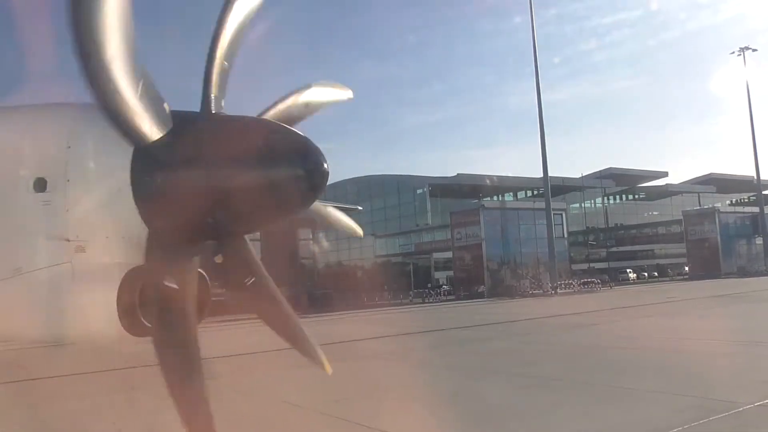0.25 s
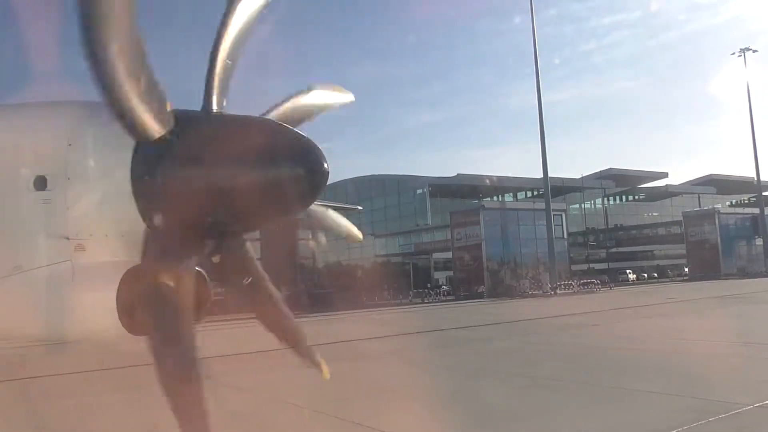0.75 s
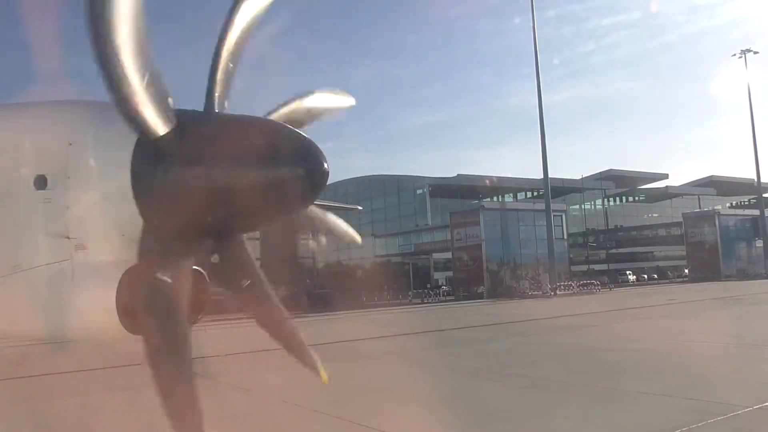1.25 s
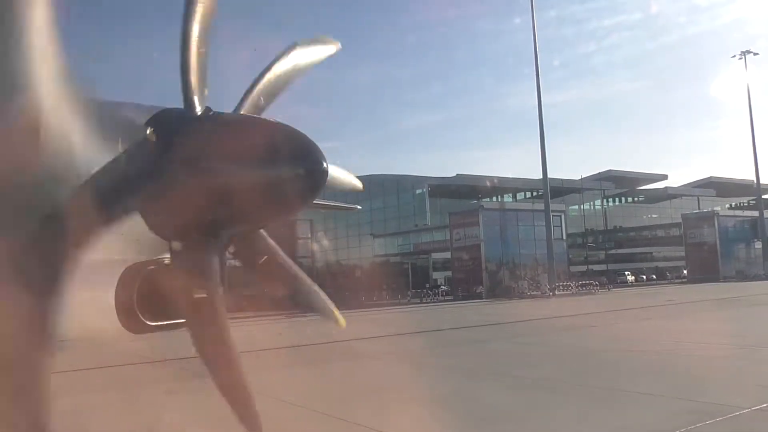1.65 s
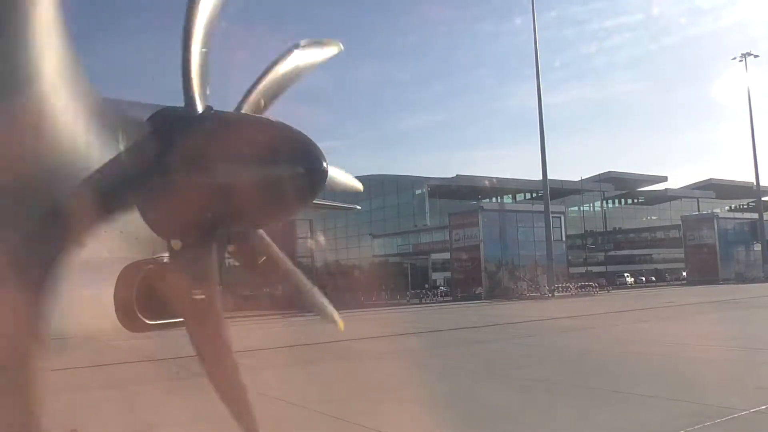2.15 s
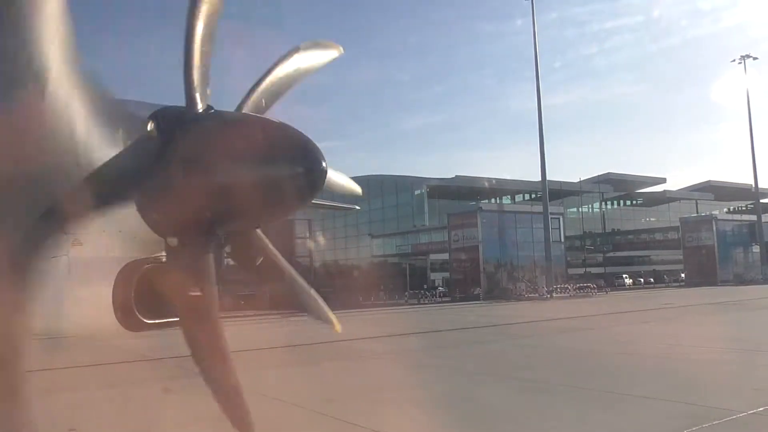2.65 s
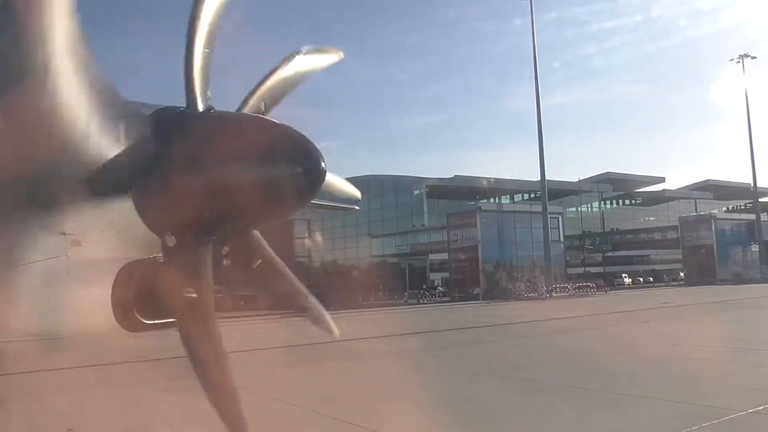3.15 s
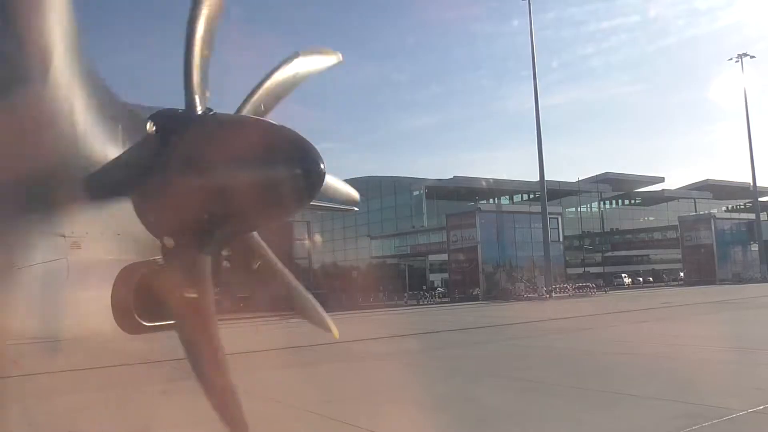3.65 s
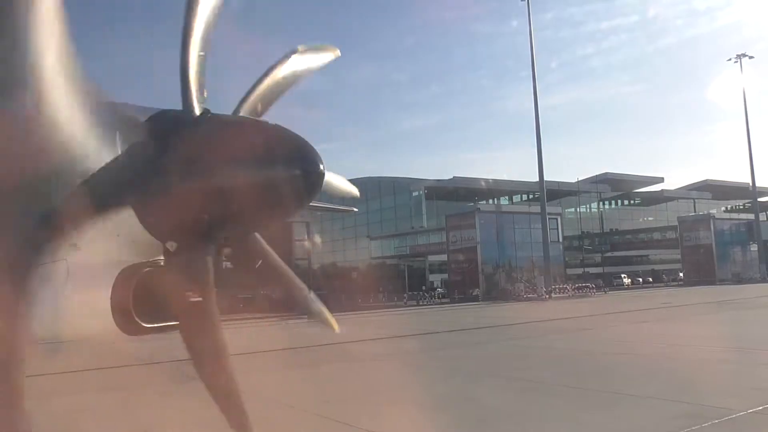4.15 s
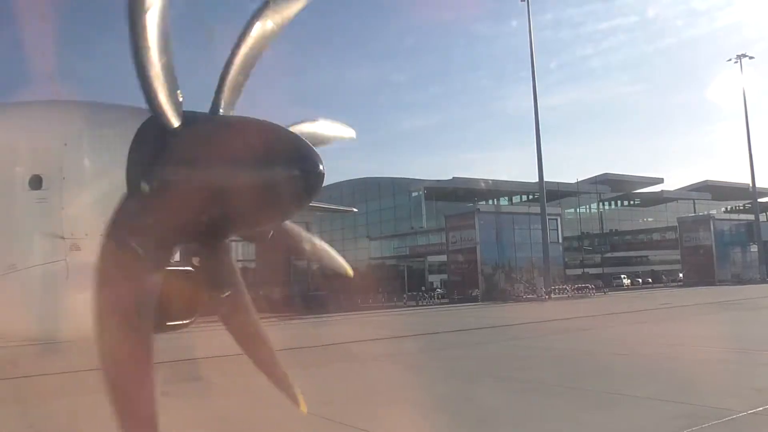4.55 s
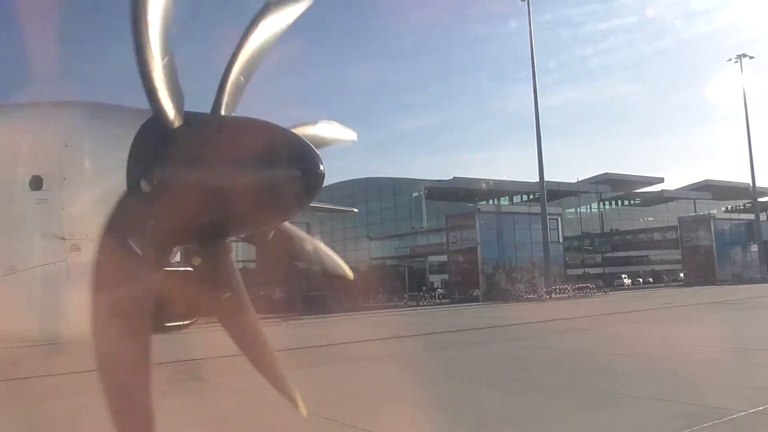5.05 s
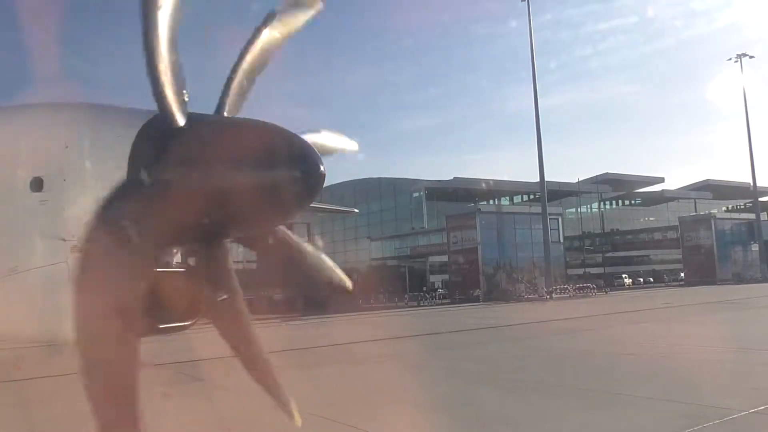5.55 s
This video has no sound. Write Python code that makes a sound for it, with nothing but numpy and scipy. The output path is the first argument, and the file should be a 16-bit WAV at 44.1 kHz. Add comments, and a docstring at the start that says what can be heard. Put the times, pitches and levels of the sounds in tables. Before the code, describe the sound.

Inside a parked propeller plane, a dense bassy drone fills everything from start to end, its low booms swelling and fading unevenly. Treble is very quiet: soft hiss and a thin steady whine. Near the microphone, two quick hard snaps occur around the first second, followed by light cloth or finger rustling and a few barely noticeable ticks.

```python
"""From the start a turboprop idles on the apron, heard through the cabin wall by a two-port microphone:
band-shaped noise booms in the cabin's resonances, near-sines beat on the shaft orders,
a faint turbine whine and a thin hiss lie on top. Dull filtered clicks tick from 0.3 s on, grainy noise
bursts rustle from 0.6 s on; two bright snaps at 0.73 and 1.0 s have short pitched rings of narrow noise
in them and faint chirps around them."""
import sys
import numpy as np
from scipy import signal
from scipy.fft import rfft, irfft, next_fast_len
from scipy.io import wavfile
from scipy.ndimage import uniform_filter1d, minimum_filter1d

SR = 44100
rng = np.random.default_rng(int(sys.argv[2]) if len(sys.argv) > 2 else 0)


def output_pcm(signal):
    """Save a mono or channel-first signal as 16-bit PCM at the path in sys.argv[1].

    Samples are clipped to [-1, 1] before scaling.
    """
    pcm = np.clip(np.atleast_2d(signal).T, -1, 1) * 32767
    wavfile.write(sys.argv[1], SR, np.round(pcm).astype(np.int16))


N = 256220
SIZE = next_fast_len(N)
T = np.arange(N) / SR
HZ = np.maximum(np.arange(SIZE // 2 + 1) * SR / SIZE, 1)

# Coherence of the ports in the roar: (frequency [Hz], coherence [0-1])
ROAR_COHERENCE = [(60, 0.97), (160, 1), (270, 0.93), (450, 0.81), (740, 0.99), (950, 0.86), (1220, 0.57),
                  (1550, 0.49), (2000, 0.35), (3300, 0.91), (5500, 0.092)]
# Phase by which left leads in the roar: (frequency [Hz], phase [rad])
ROAR_PHASE_LEAD = [(60, 0.21), (300, -.04), (860, 0.56), (1210, 0.16), (1550, 0.69), (1810, 1),
                   (2500, -0.81), (4000, -0.014)]
# Port imbalance of all stereo noise: (frequency [Hz], left minus right [dB])
PORT_BALANCE = [(60, 2), (130, -0.8), (290, 0.5), (640, -3.5), (1410, -2.5), (3100, 1.0), (6820, 0.5),
                (15000, 1)]

# Broad noise passed by the wall: (frequency [Hz], relative density [dB per Hz])
WALL_SPECTRUM = [(30, -48), (42, -37.5), (52, -27.5), (60, -17.5), (75, -13.5), (103, -17.5), (146, -18),
                 (170, -14), (285, -14.5), (450, -13), (520, -19), (650, -20), (900, -25.5), (1300, -34.5),
                 (1750, -50), (3000, -58.5), (6000, -75.5)]
# Hull and cabin resonances: (frequency [Hz], half-width at quarter power [Hz], power added re wall [dB])
BOOMS = [(62.8, 3.5, 8.5), (88.6, 3.5, 2.5), (123.4, 9.2, 10), (196, 16, 11), (237.7, 15, 9.5),
         (257.1, 9.8, 13.5), (311.6, 10, 10), (342, 26, 4.5), (391.5, 12, 11.5), (408.6, 14, 10),
         (366, 26, 5.5), (438.8, 26, 5), (525, 10, 3), (580, 38, 2.5), (689, 15, 2), (782, 55, 7)]
# Edges of the roar's registers: [Hz]
REGISTER_EDGES_HZ = [0, 103, 150, 220, 285, 350, 520, 900, 22050]
# Level of each register, lowest first: (time [s], level [dB rms])
DEEP_BOOM_LEVEL = [(0.05, -31), (0.24, -31), (0.38, -23.5), (0.51, -32.5), (1.39, -30.5), (1.53, -22),
                   (1.68, -44.5), (1.73, -30), (2.92, -26.5), (3.11, -35), (5.04, -26.5), (5.22, -33.5),
                   (5.44, -24), (5.78, -35.5)]
SECOND_BOOM_LEVEL = [(0.049, -24.5), (0.261, -29.5), (0.3, -16.5), (0.961, -24), (1.759, -22.5),
                     (1.92, -16), (2.199, -27), (3.031, -15), (3.11, -40), (3.261, -9), (3.32, -33.5),
                     (3.4, -18), (3.66, -21), (5.78, -23)]
THIRD_BOOM_LEVEL = [(0.05, -35), (0.1, -28), (0.66, -17.5), (1.52, -26.5), (1.741, -17.5), (2.27, -24.5),
                    (2.56, -14.5), (2.75, -26.5), (2.779, -22), (4.888, -20.5), (4.95, -17), (5.16, -29),
                    (5.299, -19), (5.781, -23.5)]
FOURTH_BOOM_LEVEL = [(0.05, -20), (0.16, -18), (1.289, -20), (1.76, -13.5), (1.82, -26.5), (1.899, -14),
                     (2.46, -23), (2.49, -16), (3.11, -20.5), (4.02, -17), (4.15, -31), (4.23, -13.5),
                     (4.49, -26.5), (4.53, -8), (4.73, -27.5), (4.79, -18), (5.76, -20.5), (5.78, -36)]
FIFTH_BOOM_LEVEL = [(0.05, -13), (0.08, -25), (0.46, -16.5), (0.51, -34), (0.61, -19), (1.66, -22.5),
                    (1.84, -12.5), (1.87, -27), (2.27, -15.5), (2.36, -23), (2.92, -19), (4.23, -18.5),
                    (4.36, -23), (5.16, -18.5), (5.73, -22.5), (5.78, -31)]
SIXTH_BOOM_LEVEL = [(0.05, -18.5), (0.57, -14.5), (0.82, -18.5), (0.85, -10.5), (0.93, -21), (1.01, -15),
                    (2.67, -17), (2.71, -21), (2.95, -11.5), (3.05, -22), (3.19, -16), (5.68, -16.5),
                    (5.7, -12.5), (5.78, -19)]
UPPER_HUM_LEVEL = [(.05, -24), (.15, -27), (.58, -27.5), (.92, -25.5), (1.13, -28.5), (1.26, -26),
                   (1.6, -28), (1.69, -24), (1.79, -28.5), (2.74, -26.5), (3.46, -27), (4.5, -24.5),
                   (4.6, -28), (4.69, -22.5), (4.8, -25.5), (5.4, -26.5), (5.78, -28)]
TOP_HUM_LEVEL = [(.05, -38), (.64, -38), (.76, -34.5), (.84, -38.5), (1.5, -38), (1.68, -36), (1.9, -39),
                 (3.6, -37.5), (3.73, -35), (3.969, -38), (4.15, -37), (5.3, -37), (5.78, -40)]

# Propeller tones; six blades put the blade rate at 6: (multiple of shaft rate, level before drift [dB rms])
SHAFT_ORDERS = [(3, -55), (4, -33), (5, -41), (6, -33), (7, -38), (10, -35), (12, -30), (16, -31)]
# Turbine tone before drift: (time [s], peak level re WHINE_REF_PEAK [dB])
WHINE_LEVEL = [(0, -82), (1.4, -81), (1.6, -78), (2.5, -78), (2.95, -83), (3.05, -76), (4.2, -76),
               (5.75, -78)]
# Air vents and preamp: (frequency [Hz], relative density [dB per Hz])
HISS_SPECTRUM = [(1470, -27), (2500, -11.5), (3890, -9), (4290, -4.5), (4600, -5.5), (5650, -9.5),
                 (10600, -9), (12600, -12.5), (14800, -18.5), (15400, -41.5)]

# Dull ticks: (time [s], peak, mean of ports [dB], left minus right [dB])
TICKS = [(.308, -30.5, -10), (1.928, -34, 0), (2.504, -33.5, -6), (3.753, -33, -2), (5.7165, -31, -10)]
# Cloth or fingers near the microphone:
# (onset [s], bright-part level [dB rms], length [s], low part re bright part [dB])
RUSTLES = [(.59, -63, 0.028, -5.5), (.75, -55, .018, -6), (.966, -55, 0.036, -5), (1.012, -62.5, 0.02, -3),
           (1.645, -54.5, 0.05, -3.5), (1.742, -54.5, 0.018, -2.5), (2.03, -60, .05, -4.5),
           (2.085, -55.5, 0.041, -1.5), (2.135, -56.5, .075, -0.5), (2.328, -54, 0.015, 2),
           (2.56, -58.5, 0.029, -4), (2.7, -61.5, 0.062, -3), (2.84, -62.5, 0.033, -4),
           (3.132, -57, .03, -0.5), (3.18, -61.5, .04, 2), (3.235, -62, .035, -2),
           (3.341, -54, 0.0096, 3.5), (3.58, -65, .06, 0), (4.13, -63, 0.056, -1), (4.63, -61.5, 0.084, 0),
           (4.842, -57, 0.031, 0.5), (5.05, -58.5, 0.058, -6), (5.25, -66, 0.15, 5)]
# Rustle spectra, bright and low part: (frequency [Hz], relative density [dB per Hz])
RUSTLE_BRIGHT_SPECTRUM = [(4500, -14), (6200, -5), (7300, 0), (10000, -1), (12500, -4), (13500, -14),
                          (15600, -28)]
RUSTLE_LOW_SPECTRUM = [(1800, -10), (2600, -3), (4000, 0), (5600, -3), (7000, -10)]
# Short pitched rings of the snaps and faint chirps around them:
# (center time [s], pitch [Hz], crest level [dB rms], half-length to 1/e [s])
SNAP_RINGS_AND_CHIRPS = [(.692, 5100, -55, .003), (.702, 5100, -62, .003), (.7415, 3500, -44, .004),
                         (.743, 2950, -50, .003), (.752, 3300, -51, .004), (.913, 5300, -61, .004),
                         (.927, 5300, -58.5, .006), (.979, 7800, -58, .003), (1.006, 5600, -49, .003),
                         (1.01, 2600, -50, .004), (1.012, 3400, -49, .004), (1.015, 5900, -50, .004),
                         (1.037, 5800, -60, .004)]
# Snaps of a hard plastic part: (onset [s], crack level [dB rms], length [s], body re crack [dB])
SNAPS = [(.730, -38, .014, -9.5), (1.001, -41.5, .013, -6)]
# Snap spectra, crack and body: (frequency [Hz], relative density [dB per Hz])
SNAP_CRACK_SPECTRUM = [(5000, -18), (6500, -6), (7500, 1), (9000, 2), (12000, 4), (13500, 3), (14300, -3),
                       (15600, -10)]
SNAP_BODY_SPECTRUM = [(1800, -5), (2600, 0), (3500, 0), (4600, -4), (5800, -3), (7000, -10)]

REGISTER_SMOOTH_S = .2
SHAFT_HZ = 15.94
WHINE_HZ, WHINE_REF_PEAK = 4195, 1.586774
WHINE_SKIRT_HZ, WHINE_SKIRT_DB = 70, -72.5
HISS_DB = -59.5
WHISTLE_HZ, WHISTLE_WIDTH_HZ, WHISTLE_DB = 2150, 170, -62
TICK_LOW_HZ, TICK_HIGH_HZ = 800, 1900
RUSTLE_RISE_SHARE, RUSTLE_T60_S, RUSTLE_COHERENCE = .45, .2, .05
RUSTLE_GRAIN_DB, RUSTLE_GRAINS_PER_S = 3.5, 400
RING_WIDTH_SHARE = .055   # of the pitch
SNAP_RISE_SHARE, SNAP_T60_S, SNAP_COHERENCE = .55, .085, .2
SNAP_GRAIN_DB, SNAP_GRAINS_PER_S = 2.5, 250
SNAP_LEFT_LEAD_S = .00002
LIMIT, LIMIT_S = .99, .006
CUTOFF_HZ = 15600


def from_db(db):
    """Decibels to gain."""
    return 10 ** (np.asarray(db) / 20)


def rms_one(x):
    """Scale to unit rms."""
    return x / np.sqrt(np.mean(x ** 2) + 1e-20)


def to_time(bins):
    """Frequency bins to samples."""
    return irfft(bins, SIZE)[..., :N]


def in_time(rows):
    """Curve value at every sample."""
    return np.interp(T, *np.transpose(rows))


def at_hz(points):
    """Table value at every bin, straight on a log-frequency axis."""
    hz, value = np.transpose(points)
    return np.interp(np.log(HZ), np.log(hz), value)


def slope_gain(points):
    """Spectrum gain, falling 30 dB per octave outside the table."""
    below = np.maximum(points[0][0] / HZ, 1)
    above = np.maximum(HZ / points[-1][0], 1)
    return from_db(at_hz(points) - 30 * np.log2(below * above))


def hump(hz, width_hz):
    """Resonance power: 1 at the center, a quarter at width_hz off it."""
    return 1 / (1 + ((HZ - hz) / width_hz) ** 2) ** 2


def drift(rate_hz):
    """Low-passed chance of unit rms, changing about rate_hz times a second."""
    bins = rfft(rng.standard_normal(SIZE))
    return rms_one(to_time(bins / (1 + (HZ / rate_hz) ** 2)))


def stereo_noise(gain, coherence, phase_lead_rad=0):
    """Unit-rms port pair: shared noise, phase-shifted between ports, plus and minus a second noise."""
    shared, own = rfft(rng.standard_normal((2, SIZE)))
    coherence = np.clip(coherence, 0, 1)
    sign = np.array([[1], [-1]])   # left, right
    common = np.sqrt(1 + coherence) * shared * np.exp(.5j * phase_lead_rad * sign)
    opposed = np.sqrt(1 - coherence) * own * sign
    balance = from_db(sign * at_hz(PORT_BALANCE) / 2)
    return rms_one(to_time((common + opposed) * gain * balance))


def roar():
    """Turbulent air on the hull, lifted at resonances; each register is levelled, then follows its curve."""
    lift = 1 + sum(from_db(lift_db) ** 2 * hump(hz, width_hz) for hz, width_hz, lift_db in BOOMS)
    gain = slope_gain(WALL_SPECTRUM) * np.sqrt(lift)
    air = stereo_noise(gain, at_hz(ROAR_COHERENCE), at_hz(ROAR_PHASE_LEAD))
    bins = rfft(air, SIZE)
    levels = (DEEP_BOOM_LEVEL, SECOND_BOOM_LEVEL, THIRD_BOOM_LEVEL, FOURTH_BOOM_LEVEL,
              FIFTH_BOOM_LEVEL, SIXTH_BOOM_LEVEL, UPPER_HUM_LEVEL, TOP_HUM_LEVEL)
    span = round(REGISTER_SMOOTH_S * SR)
    out = 0
    for low_hz, high_hz, level in zip(REGISTER_EDGES_HZ, REGISTER_EDGES_HZ[1:], levels):
        part = to_time(bins * ((HZ > low_hz) & (HZ <= high_hz)))
        power = np.mean(part ** 2, axis=0)
        slow_power = uniform_filter1d(uniform_filter1d(power, size=span), size=span)
        out = out + part / np.sqrt(slow_power) * from_db(in_time(level))
    return out


def propeller():
    """Near-sines on shaft orders; common speed and separate strengths drift."""
    turns = np.cumsum(SHAFT_HZ * (1 + .0012 * drift(.5))) / SR
    out = 0
    for order, db in SHAFT_ORDERS:
        level = np.sqrt(2) * from_db(db + 2.5 * drift(.7))
        out = out + level * np.sin(2 * np.pi * (order * turns + rng.random()))
    return out


def whine():
    """Turbine tone wandering a few Hz, inside a skirt of narrow noise."""
    turns = np.cumsum(WHINE_HZ + 2.7 * drift(1.5)) / SR
    peak = WHINE_REF_PEAK * from_db(in_time(WHINE_LEVEL) + 1.5 * drift(3))
    port_lag_rad = np.array([[0], [.8]])
    tone = peak * np.sin(2 * np.pi * turns - port_lag_rad)
    skirt = stereo_noise(np.sqrt(hump(WHINE_HZ, WHINE_SKIRT_HZ)), .3)
    return tone + from_db(WHINE_SKIRT_DB) * skirt


def hiss():
    """Flickering smooth treble noise with a faint whistling band."""
    whistle = stereo_noise(np.sqrt(hump(WHISTLE_HZ, WHISTLE_WIDTH_HZ)), .7)
    treble = stereo_noise(slope_gain(HISS_SPECTRUM), .048)
    return (from_db(WHISTLE_DB + 1.8 * drift(12)) * whistle
            + from_db(HISS_DB + 1.0 * drift(7)) * treble)


def ticks():
    """Single clicks through a band-pass, scaled to their peaks."""
    band = signal.butter(2, [TICK_LOW_HZ, TICK_HIGH_HZ], "band", fs=SR, output="sos")
    unit_peak = np.abs(signal.sosfilt(band, signal.unit_impulse(200))).max()
    clicks = np.full((2, N), 1e-18)   # floor keeps denormals out of the filter
    for s, db, pan_db in TICKS:
        port_db = db + np.array([pan_db, -pan_db]) / 2
        clicks[:, round(s * SR)] = from_db(port_db) / unit_peak
    return signal.sosfilt(band, clicks)


def bursts(rows, rise_share, t60_s, high_gain, low_gain, coherence, left_lead_s, grain_db, grains_per_s):
    """Grainy noise that swells, holds and dies: a bright part, which may lead at left, and a diffuse low part."""
    high, low = np.zeros((2, N))
    for s, db, length_s, low_db in rows:
        near = slice(round(s * SR), round((s + length_s + t60_s) * SR))
        age = T[near] - s
        rise_s = rise_share * max(length_s, .002)
        swell = np.sin(np.pi / 2 * np.clip(age / rise_s, 0, 1)) ** 2
        shape = swell * from_db(db - 60 * np.maximum(age - length_s, 0) / t60_s)
        high[near] += shape
        low[near] += shape * from_db(low_db)
    high_grain = rms_one(from_db(grain_db * drift(grains_per_s)))
    low_grain = rms_one(from_db(grain_db * drift(grains_per_s)))
    bright = stereo_noise(high_gain, coherence, 2 * np.pi * HZ * left_lead_s)
    diffuse = stereo_noise(low_gain, .052)
    return high_grain * high * bright + low_grain * low * diffuse


def rustles():
    """Soft broad rubbing in uneven grains."""
    return bursts(RUSTLES, RUSTLE_RISE_SHARE, RUSTLE_T60_S,
                  slope_gain(RUSTLE_BRIGHT_SPECTRUM), slope_gain(RUSTLE_LOW_SPECTRUM),
                  RUSTLE_COHERENCE, 0, RUSTLE_GRAIN_DB, RUSTLE_GRAINS_PER_S)


def snap_rings_and_chirps():
    """Short pitched rings and faint chirps: narrow noise under a Gaussian, each scaled to its level."""
    out = 0
    for s, hz, db, length_s in SNAP_RINGS_AND_CHIRPS:
        shape = np.exp(-((T - s) / length_s) ** 2)
        puff = shape * stereo_noise(np.sqrt(hump(hz, RING_WIDTH_SHARE * hz)), .5)
        out = out + from_db(db) * rms_one(puff) * np.sqrt(np.mean(shape ** 2))
    return out


def snaps():
    """Bright crack over a broad, duller body."""
    return bursts(SNAPS, SNAP_RISE_SHARE, SNAP_T60_S,
                  slope_gain(SNAP_CRACK_SPECTRUM), slope_gain(SNAP_BODY_SPECTRUM),
                  SNAP_COHERENCE, SNAP_LEFT_LEAD_S, SNAP_GRAIN_DB, SNAP_GRAINS_PER_S)


def scene():
    """Sum of all sources at the microphone."""
    return (roar() + propeller() + whine() + hiss() + ticks() + rustles()
            + snap_rings_and_chirps() + snaps())


def record(dry):
    """Smooth limiter on the highest crests, then a steep low-pass."""
    span = round(LIMIT_S * SR)
    peak = np.abs(dry).max(axis=0)
    needed = minimum_filter1d(LIMIT / np.maximum(peak, LIMIT), size=3 * span)
    gain = uniform_filter1d(uniform_filter1d(needed, size=span), size=span)
    low_pass = signal.ellip(12, .1, 80, CUTOFF_HZ, fs=SR, output="sos")
    return signal.sosfilt(low_pass, dry * gain)


dry = scene()
out = record(dry)
output_pcm(out)
```